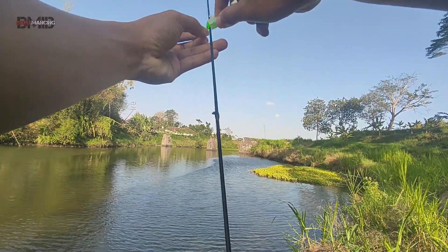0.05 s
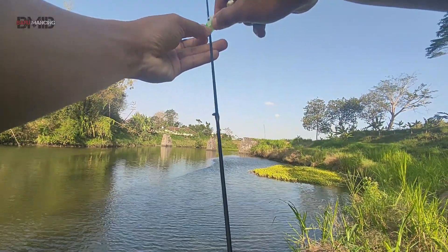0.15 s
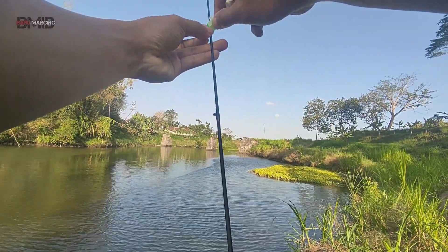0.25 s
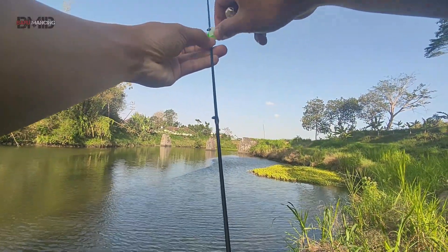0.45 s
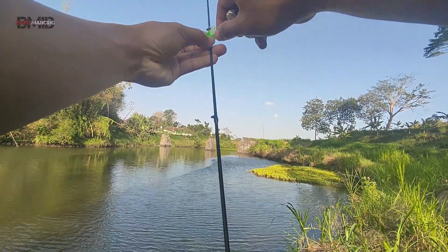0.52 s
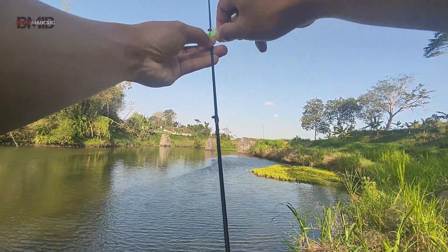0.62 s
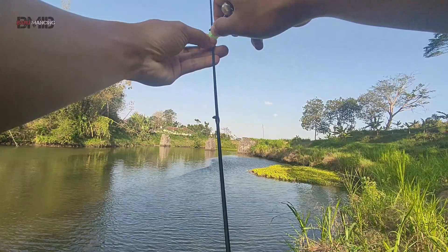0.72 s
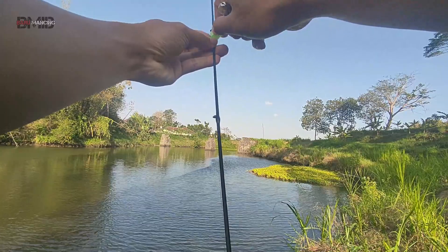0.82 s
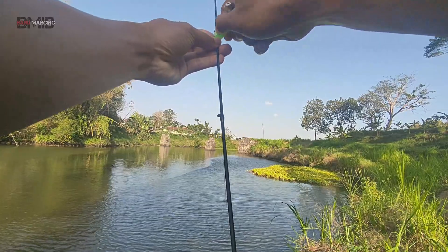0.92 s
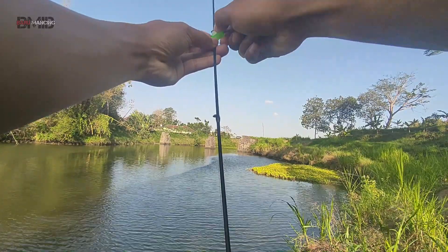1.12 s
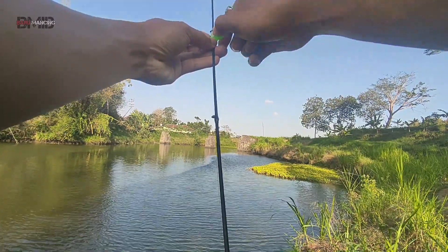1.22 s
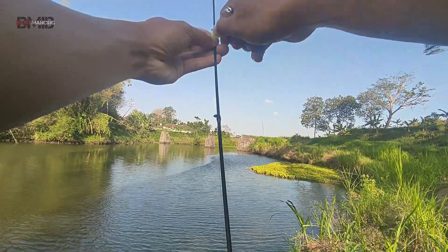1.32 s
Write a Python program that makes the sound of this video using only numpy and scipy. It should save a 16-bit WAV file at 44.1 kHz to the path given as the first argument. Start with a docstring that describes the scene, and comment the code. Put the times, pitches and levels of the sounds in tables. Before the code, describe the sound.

A small bell jingles close to the microphone as fingers clip it to a fishing rod. A few thin, muted rings lead to a louder rattling flurry that dies down, over soft wind on a river bank.

```python
"""A small pellet bell jingles close by as fingers clip it to a fishing rod on a river bank.
The pellet strikes, chatters and rolls in the shell; the fingers choke most of the rings.
Soft wind buffets the microphone over the steady rush of the bank and a few faint, far chirps."""
import sys
import numpy as np
from scipy import signal
from scipy.fft import rfft, irfft, next_fast_len
from scipy.io import wavfile
from scipy.ndimage import map_coordinates

SR = 44100
rng = np.random.default_rng(int(sys.argv[2]) if len(sys.argv) > 2 else 0)


def bounce(signal):
    """Save signal as a 16-bit WAV file at the path given by the first command-line argument."""
    frames = np.transpose(np.atleast_2d(signal))
    limited = np.clip(frames, -1, 1)
    pcm = np.round(limited * 32767).astype(np.int16)
    wavfile.write(sys.argv[1], SR, pcm)


N = 59535
T = np.arange(N) / SR

# pellet contacts: t/s, low/dB, middle/dB, top/dB (mode groups), t60 as a multiple of the free ring,
# upper mode's share of the low pair (0-1), rise/ms
STRIKES = [(.2, -26.5, -53, -48, 1.4, 0.45, 2.4), (.2402, -5, -27.5, -48, 0.23, 0, 0.52),
           (.35, -20.5, -43, -52, 0.56, 0, 1.2), (.3565, -7.5, -33, -50, 0.31, 0.05, 1.8),
           (.372, -19.5, -44, -45, 1.02, 0.47, 1.3), (.386, -36, -57, -54, 0.5, 0.3, 1),
           (.513, -32, -33, -55, 0.44, .6, 0.86), (.534, -38, -51, -49, 2.2, 0.9, 2.8),
           (.6985, -6.5, -27, -27, 0.28, 0.38, 0.94), (.705, -5, -19, -23, 0.3, 0, 2.8),
           (.724, -11, -30, -30, 0.29, 0.5, 0.97), (.729, -21.5, -40, -21, 1.84, .9, 0.8),
           (.7405, -1, -5, -11.5, 0.41, 0.44, 1.23), (.7465, -12, -21.5, -12.5, 0.95, 0.94, 1.5),
           (.787, -7.5, -34, -20.5, 0.53, 0.94, 0.91), (.8145, -30, -33, -47, 2, .9, .8),
           (.8247, -7.5, -42, -18.5, 0.16, 0.65, 0.34), (.8275, -2.5, -36, -38, 0.46, 0.85, 0.64),
           (.8465, 2.5, -38, -23, 0.43, 1, 1.24), (.863, -13, -45, -48, 0.59, 1, 0.71),
           (.87, -0.5, -10.5, -13, 0.36, 0.45, 0.7), (.883, -29, -35, -4, 0.11, 1, 0.26),
           (0.891, -18.5, -27, -11, 0.77, 0.94, 1.1), (.9355, -23, -32, -30, 0.39, 0.24, 0.72),
           (.9425, -13.5, -29, -36, 0.42, 0.7, 2.3), (.949, -16, -31, -29, 0.36, 0.4, 1.4),
           (.966, -27, -34, -39, 0.32, 0.46, 1), (.983, -32.5, -52, -55, .5, 0, 0.4),
           (.996, -30, -39, -50, 1.5, 0.6, 0.85), (1.0095, -11.5, -26, -25, 0.43, 0.53, 0.72),
           (1.013, -11, -39, -28.5, 0.81, 0.21, 1), (1.041, -14.5, -24, -29, 0.35, 0.44, 1),
           (1.07, -8.5, -38, -10.5, 0.34, 0, 0.43), (1.077, -6, -17.5, -39, 0.44, 0.13, 0.23),
           (1.093, -12.5, -24, -30, 0.26, 0.03, 0.67), (1.127, -27.5, -28, -28, 0.085, .2, 0.36),
           (1.271, -31.5, -48, -48, 0.66, 0.2, 0.92), (1.3125, -31.5, -28, -40, 0.43, 0.07, 1.7)]


def amp(db):
    """Decibels to gain."""
    return 10 ** (np.asarray(db) / 20)


def unit(x):
    """Scale to rms 1."""
    return x / np.sqrt(np.mean(x ** 2) + 1e-20)


def along(points, hz):
    """Interpolate (f/Hz, value) points on a log axis."""
    f, values = np.transpose(points)
    return np.interp(np.log(hz + 1), np.log(f + 1), values)


def curve(points):
    """Interpolate (t/s, value) points at every sample."""
    return np.interp(T, *np.transpose(points))


def pan(db):
    """Stereo gains for a left-minus-right level."""
    return amp(np.array([[db], [-db]]) / 2)


def fade(t, t60_s):
    """Exponential decay from t = 0."""
    return (t >= 0) * np.exp(-np.log(1000) * np.abs(t) / t60_s)


def wobble(knots_per_s):
    """Smooth random curve."""
    return map_coordinates(rng.standard_normal(400), [T * knots_per_s], mode="mirror")


def filtered(x, response):
    """Apply the frequency response response(hz)."""
    size = next_fast_len(N + 8192)
    return irfft(rfft(x, size) * response(np.fft.rfftfreq(size, 1 / SR)), size)[..., :N]


def noise(*spectra):
    """Stereo noise of rms 1 with open-air correlation; the (f/Hz, level/dB) spectra add in dB."""
    # likeness at the two microphone ports: f/Hz, correlation
    correlation = [(60, 0.13), (130, 0), (300, 1), (600, 0.98), (1400, 0.37), (3000, 0.18), (6000, 0),
                   (12000, 0.34)]

    def mid_side_gains(hz):
        angle = np.arccos(np.clip(along(correlation, hz), -1, 1)) / 2
        return amp(sum(along(points, hz) for points in spectra)) * [np.cos(angle), np.sin(angle)]

    mid, side = filtered(rng.standard_normal((2, N)), mid_side_gains)
    return unit(np.array([mid + side, mid - side]))


def bell(detune=0.001, spread_db=0.9, chatter_per_s=700, chatter_gain=0.12, chatter_decay_s=0.006):
    """Each contact and its rebounds ring the shell; a tight grip shortens and detunes the ring."""
    # low shell modes, a close pair and a weak neighbour: f/Hz
    low_hz = [5030, 5135, 5365]
    # the same modes: level/dB, free t60/s, L-R/dB
    low_modes = [(-2.5, 0.091, -19.5), (0, 0.064, -7.5), (-24, 0.23, -5)]
    # shell modes above the low pair, plus a low knock of the bell's body; both tables: f/Hz, level/dB, free
    # t60/s, L-R/dB
    middle_modes = [(2550, -23, .025, 0), (6300, -30, .3, 2), (10250, -1.5, .085, 7), (10680, -18, .1, 6)]
    top_modes = [(8185, -19, .14, 9), (12090, -6.5, .13, 21), (12190, -19, .05, 12), (14230, -31, .06, 10)]
    out, t = np.zeros((2, N)), T[:N // 5]
    for start_s, *levels_db, free, upper, rise_ms in STRIKES:
        upper = np.clip(upper, 0.01, 0.99)  # set by where the pellet lands
        shares_db = 20 * np.log10([1 - upper, upper, 1])
        low = [(hz, db + share_db, t60_s, pan_db)
               for hz, share_db, (db, t60_s, pan_db) in zip(low_hz, shares_db, low_modes)]
        ring = 0
        for group_db, modes in zip(levels_db, (low, middle_modes, top_modes)):
            for hz, db, t60_s, pan_db in modes:
                pitch_hz = hz * (1 + detune * max(1 - free, 0) * rng.normal())
                gain = amp(group_db + db + spread_db * rng.normal()) * pan(pan_db)
                ring = ring + gain * fade(t, t60_s * free) * np.sin(2 * np.pi * pitch_hz * t)
        onset = 1 - np.exp(-t * 1000 / rise_ms)
        rebounds = (rng.random(len(t)) < chatter_per_s / SR) * rng.standard_normal(len(t))
        contacts = chatter_gain * rebounds * np.exp(-t / chatter_decay_s)
        contacts[0] = 1  # the strike itself
        start = round(start_s * SR)
        strike = signal.fftconvolve(ring * onset, contacts[None], axes=1)[:, :N - start]
        out[:, start:start + strike.shape[1]] += strike
    return out


def clicks(click_db=-20.5, click_t60_s=0.0025, scatter_db=-20.5, scatter_t60_s=0.045, soft_rise_ms=0.71):
    """Contacts click and scatter off hands and rod, soft ones less; the plastic clip ticks once."""
    # clip on the rod: t/s, level/dB
    ticks = [(0.4975, -27.5)]
    # click spectrum: f/Hz, level/dB
    spectrum = [(500, -51), (1800, -9.5), (2600, -1.5), (3500, -22), (4600, 9.5), (5600, 1), (7000, 0.5),
                (9000, -5), (12500, 4), (14000, -6), (16000, -36)]
    power = sum((amp(db) * fade(T - start_s, t60_s=0.015)) ** 2 for start_s, db in ticks)
    for start_s, *levels_db, _, _, rise_ms in STRIKES:
        t = T - start_s
        envelope = amp(click_db) * fade(t, click_t60_s) + amp(scatter_db) * fade(t, scatter_t60_s)
        softness = 1 + (rise_ms / soft_rise_ms) ** 2
        power = power + np.sum(amp(levels_db) ** 2) * envelope ** 2 / softness
    return np.sqrt(power) * noise(spectrum) * pan(db=5)


def rolling(peak_s=0.703, sigma_s=0.011, level_db=-25, grains_per_s=2500):
    """The pellet scrapes round the shell in one swell of tiny contacts."""
    # scrape spectrum: f/Hz, level/dB
    spectrum = [(3000, -23), (4100, -15), (5000, 1.5), (5900, -16), (7000, -14), (8800, -27),
                (10500, -14.5), (11300, -18), (12300, -31), (14500, -44)]
    grains = (rng.random((2, N)) < grains_per_s / SR) * rng.standard_normal((2, N))
    scrape = unit(filtered(grains, lambda hz: amp(along(spectrum, hz))))
    swell = amp(level_db) * np.exp(-((T - peak_s) / sigma_s) ** 2 / 2)
    return swell * scrape * pan(db=-3)


def near_reflections(x, wet_db=-14, t60_s=0.026):
    """Hands, arms and rod scatter the ring, differently to each port."""
    t = T[:N // 10]
    tail = rng.standard_normal((2, len(t))) * fade(t, t60_s)
    tail /= np.linalg.norm(tail, axis=1, keepdims=True)
    return x + amp(wet_db) * signal.fftconvolve(x, tail, axes=1)[:, :N]


def wind(flutter_db=0.84, hiss_db=-44):
    """Buffeting at the ports, the breeze along the bank and an even hiss."""
    # envelopes: t/s, level/dB
    buffet_levels = [(0.0, -39), (0.052, -31), (0.096, -42), (0.134, -30.5), (0.154, -36.5), (0.248, -35),
                     (0.266, -31.5), (0.356, -34.5), (0.368, -37.5), (0.428, -30), (0.462, -28), (0.5, -23),
                     (0.612, -30), (0.63, -32), (0.68, -26.5), (0.728, -35), (0.83, -35), (0.898, -47.5),
                     (0.946, -39), (1.06, -44.5), (1.082, -35.5), (1.262, -45), (1.288, -33.5), (1.35, -49)]
    breeze_levels = [(0.0, -39), (0.432, -38), (0.506, -36), (0.976, -43), (1.35, -39.5)]
    # spectral densities and the buffet's tilt: f/Hz, level/dB
    buffet_spectrum = [(15, -50), (25, -46), (64, -9), (91, -2.5), (184, -11.5), (300, -14), (390, -42),
                       (660, -120)]
    buffet_tilt = [(250, 10), (500, -43), (1000, -38)]
    breeze_spectrum = [(100, -25), (200, -24.5), (300, -2), (520, -1.5), (750, -7), (1000, -10.5),
                       (1400, -16.5), (2500, -16.5), (5000, -26)]
    hiss_spectrum = [(300, 2), (1000, -2), (1600, 2.5), (2600, 0), (4000, -0.5), (6000, -1), (9000, -13),
                     (13500, -9), (14300, -29), (14700, -25)]
    buffet = amp(curve(buffet_levels)) * noise(buffet_spectrum, buffet_tilt) * pan(db=-2.5)
    breeze_db = curve(breeze_levels) + flutter_db * wobble(knots_per_s=14.1)
    breeze = amp(breeze_db) * noise(breeze_spectrum) * pan(db=-0.5)
    hiss = amp(hiss_db) * noise(hiss_spectrum) * pan(db=-1)
    return buffet + breeze + hiss


def thumps(crest_s=0.005):
    """Single low thumps as the hands handle the rod."""
    # thumps: t/s, level/dB, f/Hz
    knocks = [(.126, -32.5, 114), (0.572, -19, 120), (1.284, -33, 104.4)]
    out = 0
    for start_s, db, hz in knocks:
        t = np.maximum(T - start_s, 0)
        envelope = t / crest_s * np.exp(1 - t / crest_s)
        out = out + amp(db) * envelope * np.sin(2 * np.pi * hz * t)
    return out * pan(db=-4)


def far_chirps(blur_rad=1.94, sigma_s=0.018):
    """Short blurred chirps, perhaps a bird across the water, barely above the breeze."""
    # chirps: t/s, f/Hz, level/dB
    chirps = [(.33, 1018, -39.5), (0.514, 1090, -40), (.592, 1075, -37), (.74, 1100, -36.5)]
    out = 0
    for peak_s, hz, db in chirps:
        phase = 2 * np.pi * hz * T + blur_rad * wobble(knots_per_s=160)
        envelope = np.exp(-((T - peak_s) / sigma_s) ** 2 / 2)
        out = out + amp(db) * envelope * np.sin(phase)
    return out


def scene():
    """The bell in the open air."""
    return near_reflections(bell()) + clicks() + rolling() + far_chirps() + wind() + thumps()


def record(dry):
    """The right channel lags slightly; the recorder clips at full scale and cuts the top treble."""
    # treble roll-off: f/Hz, level/dB
    roll_off = [(14200, 0), (14700, -8), (15400, -22)]
    lag_s, top_hz = 0.000315, 15493
    ports = filtered(dry, lambda hz: np.exp(1j * np.pi * hz * lag_s * np.array([[1], [-1]])))
    return filtered(np.clip(ports, -1, 1), lambda hz: amp(along(roll_off, hz)) * (hz < top_hz))


dry = scene()
out = record(dry)
bounce(out)
```